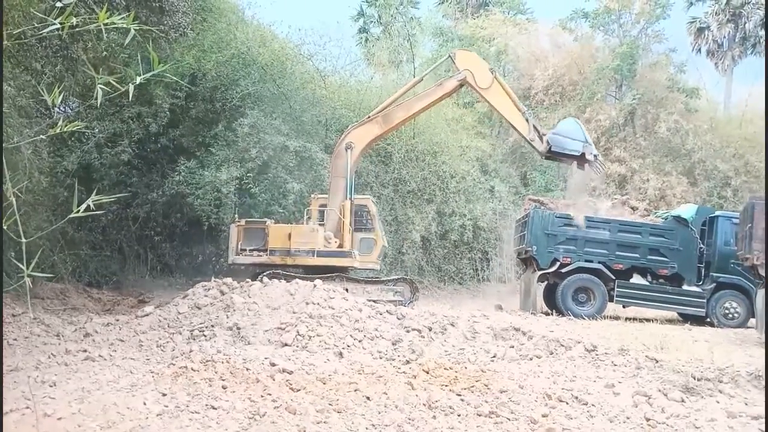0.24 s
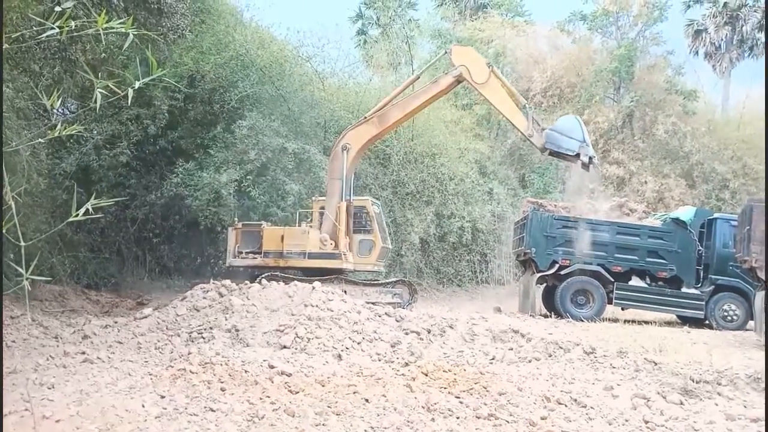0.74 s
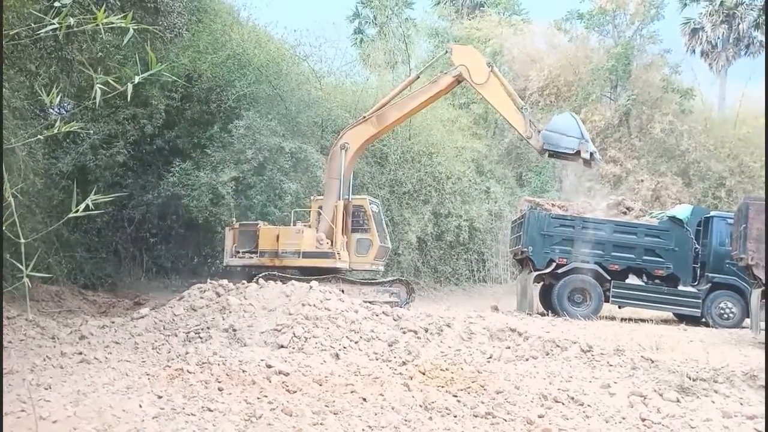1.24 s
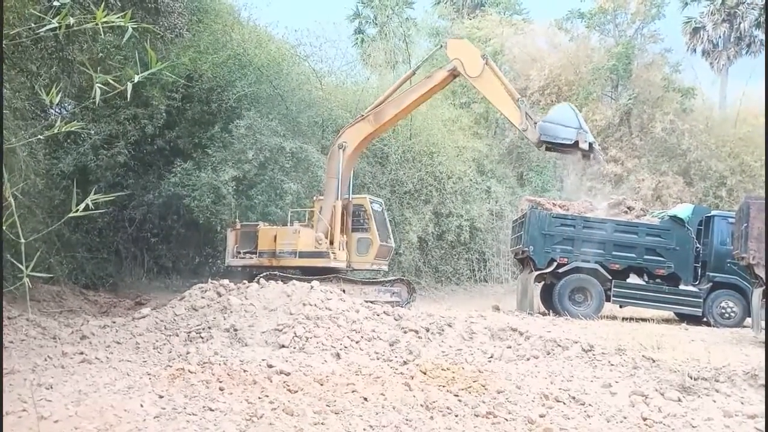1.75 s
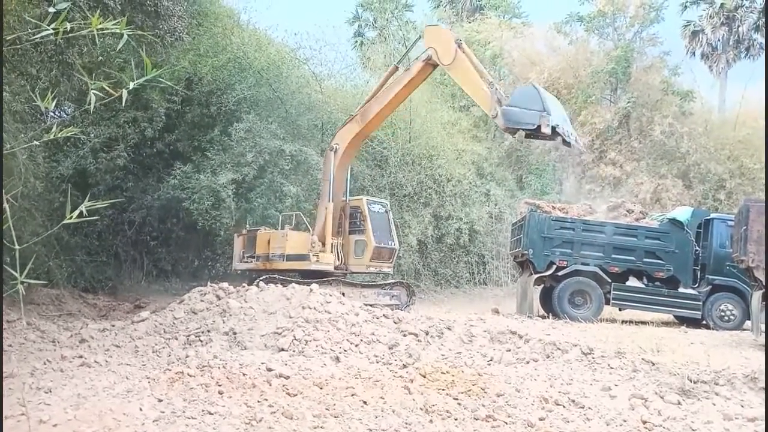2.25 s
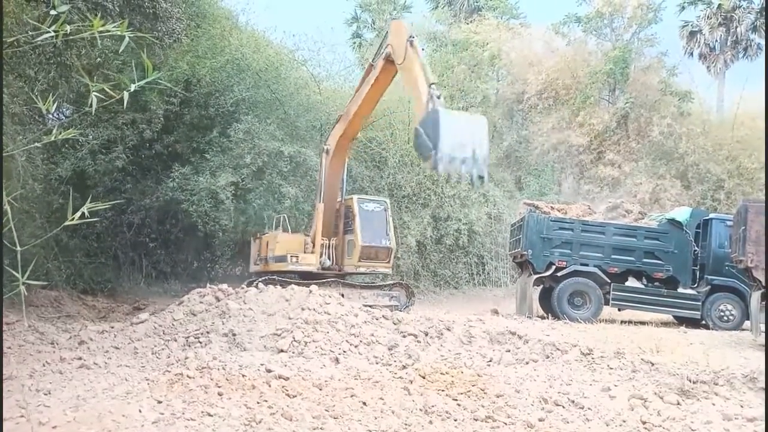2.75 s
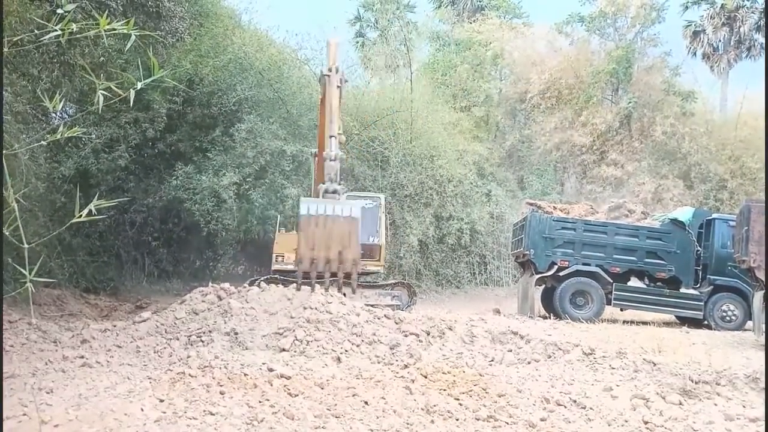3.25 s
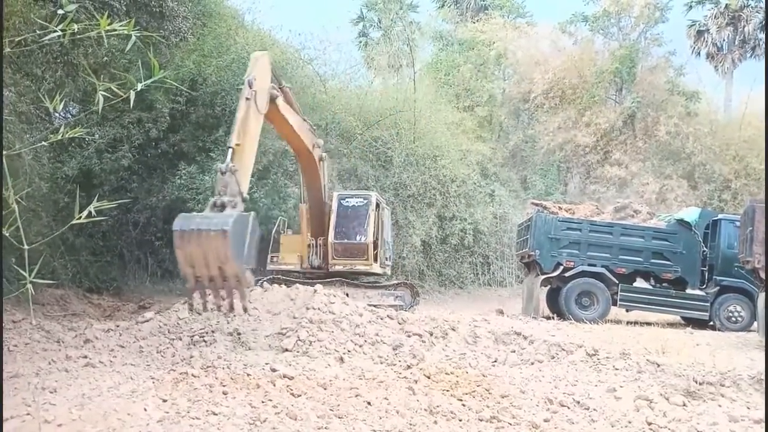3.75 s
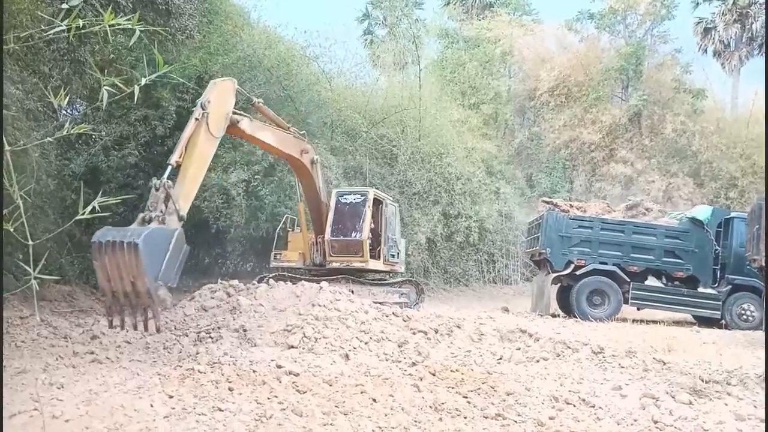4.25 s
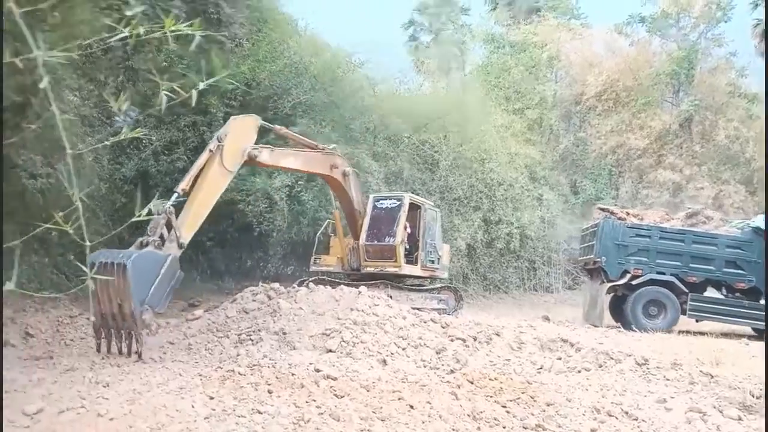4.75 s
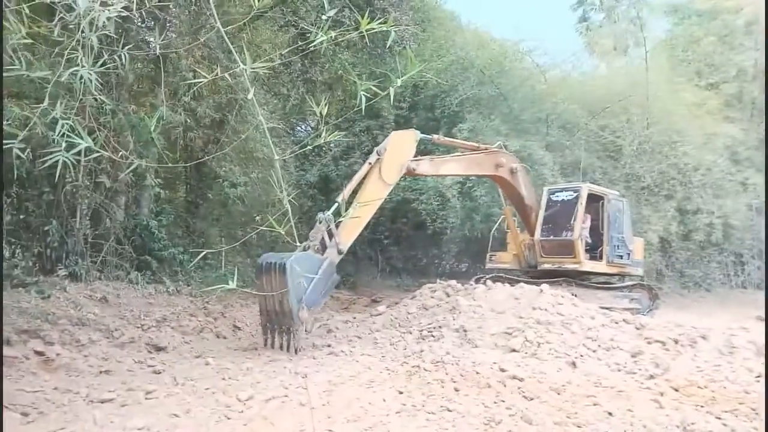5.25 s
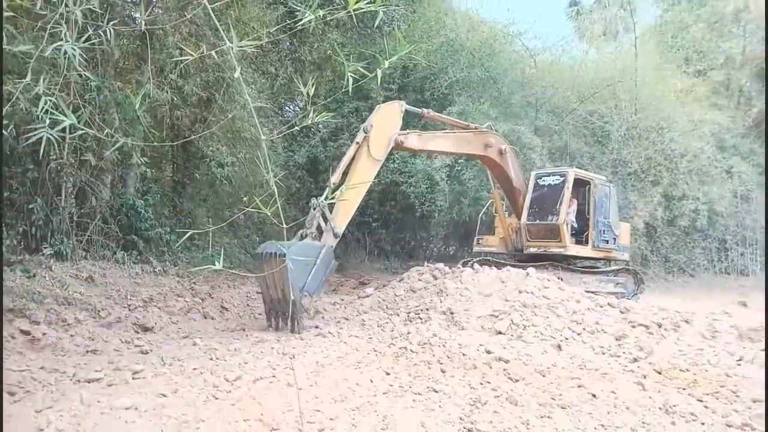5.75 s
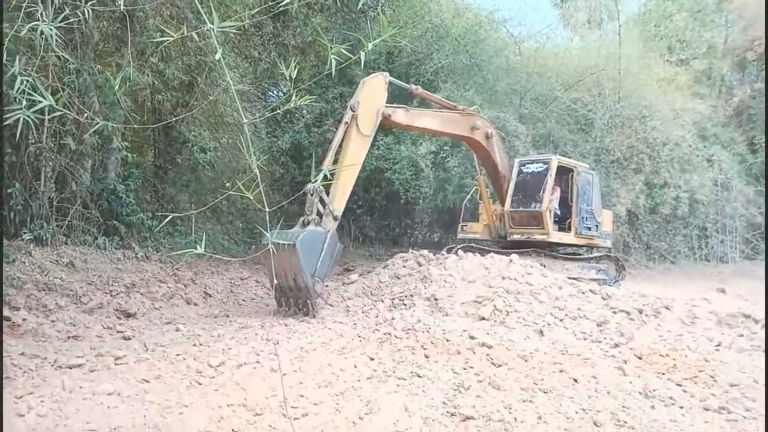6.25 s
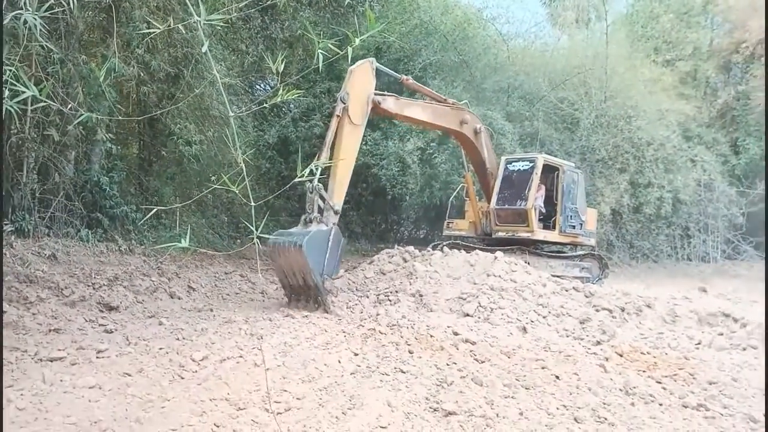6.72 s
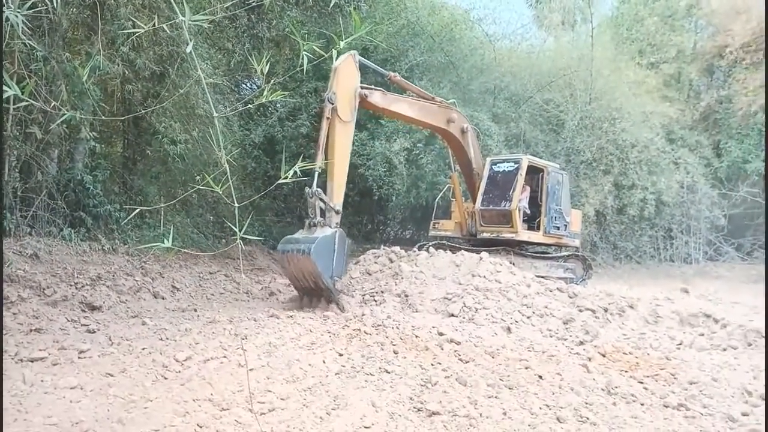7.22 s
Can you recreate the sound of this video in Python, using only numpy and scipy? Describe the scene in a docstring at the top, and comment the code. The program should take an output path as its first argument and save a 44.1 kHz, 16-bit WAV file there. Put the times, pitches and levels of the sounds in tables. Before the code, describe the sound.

Continuous engine drone, close to a low buzzing hum, under rough mid-range roar. Rattling steel knocks and dull hollow booms come early, a dense cluster follows near three seconds with a faint squeak, and more ringing knocks come around four. Then mostly engine with a low growl, before the loudest clanks of digging and low earthy thuds. Open ground with bushes smears the sound slightly; the small stereo microphone sounds dull on top, its level sinking after bursts and creeping back.

```python
"""A diesel excavator, some way off, first empties its bucket into a truck on the right, with clanks and booms.
After a short low growl it swings round and digs into stony soil, its clanks now from the middle.
Throughout, periodic exhaust tones drone over the filtered-noise roar of engine and fan; struck steel rings in modes.
Last, in a small stereo microphone, slow gain sinks after each burst of clanks and creeps back,
and a look-ahead limiter ducks everything around the hardest ones."""
import sys
import numpy as np
from scipy import signal
from scipy.fft import rfft, irfft, next_fast_len
from scipy.io import wavfile
from scipy.ndimage import uniform_filter1d, minimum_filter1d

SR = 44100
rng = np.random.default_rng(int(sys.argv[2]) if len(sys.argv) > 2 else 0)


def digitize_waveform(pressure):
    """Quantize a signal to 16-bit integers and store it at the path in sys.argv[1].

    Rows of a 2-D input are taken as channels; values are limited to [-1, 1].
    """
    field = np.atleast_2d(pressure).T
    bounded = np.clip(field, -1, 1)
    quanta = np.round(bounded * 32767).astype(np.int16)
    wavfile.write(sys.argv[1], SR, quanta)


N = 329868
T = np.arange(N) / SR

# Exhaust under changing load: t/s, firing rate f/Hz, drone level/dB
EXHAUST = [(0.0, 95, -16), (0.25, 92.9, -18), (0.37, 103.1, -15.5), (0.54, 102.4, -13.5),
           (1.29, 101.2, -14.5), (1.8, 98.6, -14), (2.64, 100.4, -12.5), (2.89, 102, -20),
           (3.58, 102.4, -16.5), (3.7, 98.6, -15), (4.08, 96.77, -16), (4.75, 95.8, -12),
           (5.29, 92.95, -12), (5.42, 98.5, -11), (5.69, 101.1, -21.5), (5.79, 100.6, -18.5),
           (6.29, 99, -12.5), (6.65, 99.4, -11), (7.1, 98.4, -16), (7.48, 99.5, -18)]
# Whine at six times the firing rate: t/s, level/dB re drone
WHINE = [(0, -12.5), (2, -23.5), (2.75, -17), (3, -27), (4.1, -15.5), (4.37, -15.5), (4.64, -28.5),
         (4.75, -7), (5.0, -15.5), (5.3, -20.5), (5.5, -21.5), (7.48, -20)]
# Other exhaust orders: multiple of the firing rate, level/dB re drone, change/(dB per Hz of sag)
ORDERS = [(1.5, -14.5, -0.6), (2, -23.5, 1.83), (3, -26, 0.69), (3.5, -30, 0.2), (8, -37.5, 0.95),
          (8.5, -32.5, 0.93), (9, -28.5, 0.63)]
FREE_HZ = 102  # firing rate without load, from which the sag is counted

# Clanks of pins and stones on the bucket: t/s, relative level/dB, centre f/Hz, low share level/dB,
# treble share level/dB, relative rattle length/s, rise time constant/s
CLANKS = [(0.22, -6, 1254, -4.5, -17.5, 0.055, 0.0026), (0.469, -8.5, 3010, -3.5, -26, 0.013, 0.0038),
          (0.684, -1, 1610, 0, -17, 0.02, 0.0075), (1.183, -1.5, 2320, -3, -27, 0.05, 0.00055),
          (1.216, -7.5, 1340, 0.5, -14, 0.031, .003), (1.251, -2.5, 1950, -7, -14, 0.035, 0.0015),
          (1.255, -9.5, 5080, -15, -17, 0.011, 0.0027), (1.426, -4, 1930, -4, -11.5, 0.035, 0.0035),
          (1.496, -11.5, 2550, -22.5, -12, 0.012, 0.00087), (1.674, -10.5, 1820, -19, -26, 0.051, 0.0039),
          (2.664, -0.5, 2430, -3, -22.5, 0.035, 0.0061), (2.687, -10, 3300, 8, -22, 0.017, 0.0067),
          (2.709, -11, 1440, -12.5, -24, 0.021, 0.0016), (2.816, -15.5, 2540, -8, -27.5, 0.029, 0.0039),
          (2.8864, 1, 1386, -12, -37, 0.046, 0.0009), (2.889, -6, 2480, -23.5, -29, 0.03, 0.00074),
          (2.979, -8.5, 2190, 0, -34, 0.012, 0.0025), (2.999, -8.5, 2390, -20.5, -38, 0.0088, .001),
          (3.031, -0.5, 2100, -3.5, -29, 0.021, 0.00078), (3.578, -3, 2080, -20, -27, 0.019, 0.00022),
          (3.599, -7, 1370, 0.5, -33, 0.053, 0.0015), (3.855, -0.5, 1650, -17, -21, 0.035, 0.00019),
          (3.916, 2, 1550, -17.5, -34, 0.036, 0.00036), (4.025, -9, 1510, -8, -42, 0.013, .0005),
          (4.052, -1.5, 1252, -24, -29, 0.023, 0.00024), (4.088, -1, 1510, -15.5, -28, 0.015, .0003),
          (4.138, 2, 1536, -10.5, -27, 0.022, .0003), (5.283, -5, 1700, -0.5, -20, 0.13, .003),
          (5.325, -12.5, 3700, -14, -20, 0.021, 0.0028), (5.408, 3, 1745, -10.5, -19.5, 0.056, 0.0046),
          (5.437, 4, 1730, -10, -28.5, 0.037, 0.0034), (5.471, -8, 1700, -11, -30, 0.019, 0.0017),
          (5.6165, 7.5, 1910, -7.5, -7, 0.045, 0.0011), (5.705, -3, 1690, -4.5, -28, 0.11, 0.0024),
          (5.8972, 0.5, 1990, -15.5, -16, 0.045, 0.0011), (5.953, -4, 3040, -4.5, -25, 0.029, 0.0019),
          (6.016, -5.5, 2340, -7, -18.5, 0.045, 0.0025), (6.166, -4, 1880, -24.5, -18.5, 0.034, 0.002),
          (6.251, -6.5, 2150, -11.5, -34, 0.038, 0.005), (6.953, -5.5, 1780, -11, -19.5, 0.032, 0.0044),
          (7.284, 1, 2780, -21.5, -31, 0.041, 0.00021), (7.296, -0.5, 1280, 4, -15, 0.036, 0.0033),
          (7.352, -5.5, 1970, -2, -23, 0.022, .002)]
# Modes of the bucket: f/Hz, relative level/dB, relative decay time/s
BUCKET_MODES = [(580, -1.5, 0.078), (708, -3, 0.22), (774, -2, 0.18), (856, 5.5, 0.061), (964, 0, 0.2),
                (1030, -1.5, 0.33), (1091, 2, 0.21), (1179, 2.5, 0.13), (1293, -2.5, 0.13),
                (1506, 0, 0.078), (1586, -0.5, 0.11), (1675, 1.5, 0.11), (1768, -4, 0.14),
                (1911, 5.5, 0.09), (2065, -3, 0.08), (2208, -4, 0.13), (2222, -4, 0.091), (2405, 0, 0.088),
                (2558, -5.5, 0.17), (2825, -3, 0.1), (3060, -3.5, 0.13), (3204, -6.5, 0.22),
                (3550, -4.5, 0.13), (3874, -6.5, 0.17), (4330, -11.5, 0.069), (4440, -7, 0.12),
                (5010, -12.5, 0.096), (5320, -15.5, 0.13), (5510, -11.5, 0.11)]
LOW_SPLIT_HZ = 1200  # bucket modes below it follow the low share
HIGH_SPLIT_HZ = 2800  # bucket modes above it ring with the treble share too

# Booms of the hollow steel arm and truck bed: t/s, relative level/dB, centre f/Hz
BOOMS = [(0.021, -2.5, 382), (0.043, -1.5, 388), (0.196, -5.5, 400), (0.465, -10, 305), (0.566, -9.5, 360),
         (0.7, -2, 315), (1.219, -6, 304), (1.437, -8, 372), (1.855, -1, 334), (2.681, -7.5, 267),
         (2.724, -4.5, 405), (2.821, -6.5, 301), (2.903, 0.5, 289), (2.976, -2.5, 345), (3.038, -1, 335),
         (3.609, -6.5, 417), (3.946, -7, 324), (4.061, -4, 342), (4.099, -8.5, 355), (4.149, -3, 352),
         (5.431, -2.5, 374), (5.478, -6.5, 365), (5.673, -4, 395), (5.814, -10, 378), (5.907, -7.5, 343),
         (6.275, -5.5, 387), (6.9, -8, 367), (7.359, -10.5, 370), (7.404, -11, 362)]
# Modes of the hollow steel: f/Hz, relative level/dB
HOLLOW_MODES = [(265, 5.5), (295, 9.5), (335, 8), (365, 9.5), (420, 7), (515, 12.5), (550, 17)]

# Engine and fan roar: t/s, then relative level/dB of body, clatter and hiss
ROAR = [(0.0, -16, -16, -30.5), (0.35, -25.5, -22.5, -42.5), (0.77, -21.5, -18.5, -40),
        (1.83, -22.5, -24, -43), (2.17, -26, -21, -39.5), (2.58, -22, -20.5, -38.5),
        (3.14, -30.5, -28, -45.5), (3.83, -26.5, -28, -41.5), (4.3, -29.5, -29.5, -40),
        (4.92, -28, -23.5, -38.5), (5.31, -26, -25.5, -36), (5.8, -27.5, -30.5, -44.5),
        (6.5, -24, -23, -38), (7.48, -32, -28, -42)]
# Turning of the house: t/s, share of the swung-round colour, stretch of the side-on peaks
SWING = [(0, 0.14, 1.), (4.2, 0.23, 1.003), (4.6, 0.18, 1.02), (5.1, 0.15, 0.936), (5.4, 1., 0.82),
         (7.48, 0.91, 0.68)]
# Colour of the machine seen side-on: f/Hz, relative spectral level/dB
SIDE_ON = [(200, -4.5), (254, -16), (290, -4), (520, -6.5), (626, -11.5), (860, -3.5), (1040, -23.5),
           (1150, -13), (1550, -5), (1670, -18.5), (1850, -11), (1990, -17), (2240, -12), (2420, -4),
           (2750, -14.5), (3250, -6), (3520, -10.5), (3900, -5), (4080, -11.5), (5100, -8), (5350, -9)]
# Colour of the machine swung round: f/Hz, relative spectral level/dB
SWUNG_ROUND = [(200, 3), (245, -15), (300, -7.5), (355, -1), (400, -7.5), (727, -11), (910, -8.5),
               (1250, -10), (1370, -27), (1660, -13.5), (1900, -23.5), (2500, -11), (2900, -14),
               (4000, -16)]
# Spectrum added to both colours of the roar: f/Hz, relative spectral level/dB
OUTSKIRTS = [(25, -23), (50, -36), (80, -11), (200, -5), (4000, 1.5), (5500, 3.6), (8000, -2.5),
             (13500, -8), (14500, -0.5)]

# Low thuds of earth in the steel: t/s, relative level/dB, f/Hz
THUDS = [(0.55, -14, 148.2), (2.71, -13, 143.4), (3.616, -4.5, 162.5), (3.929, -3, 135.3),
         (6.24, -6.5, 158.5), (6.5, -2.5, 153), (6.731, -11.5, 153)]
RUMBLE_DB, THUD_RUMBLE_DB = -26, -2  # steady rumble; swell of it re each thud
THUD_RISE_S, THUD_T60_S = 0.016, 0.28
# Low growl: start t/s, length/s, level/dB, low f/Hz, high f/Hz
GROWL = (4.5, 0.2, -27.5, 193, 319)
# Thin squeaks: t/s, f/Hz, level/dB, length/s
SQUEAKS = [(1.49, 7780, -46, .045), (2.67, 3245, -27, .1)]

# Treble loss of the microphone: f/Hz, level/dB
MICROPHONE = [(5200, -3.5), (6500, -13), (9000, -20.5), (15000, -27.5)]
# Likeness of the two ports: f/Hz, left-right correlation (0 to 1)
LIKENESS = [(100, 1.), (250, 0.97), (450, 0.95), (1000, 0.72), (1400, 0.54), (1900, 0.17), (2500, 0.29),
            (3600, 0.3), (7000, .15), (12000, 0.46)]
# Balance of the two ports: f/Hz, left minus right level/dB
LEAN = [(100, -0.44), (500, -1), (1000, 1), (1150, -1.5), (1550, 8), (1950, -1), (2350, 11.5), (2900, 3.5),
        (4200, 2), (5000, 4.5), (6200, -0.5), (9000, -3.5), (12000, 3.5)]
# Lead of the right port, machine straight ahead: f/Hz, phase/rad
AHEAD_LEAD = [(700, 0.086), (4000, 0.49), (6500, 1.96)]
# Lead of the right port, bucket out over the truck to the right: f/Hz, phase/rad
TRUCK_LEAD = [(2000, .1), (2800, 2.5), (4100, 4.4), (5800, 5.9)]
LEAVES_TRUCK_S = 2.8
# Slow gain: averaging time, threshold, share of the excess removed, smoothing time, fall of the held excess
GAIN_HEARS_S, GAIN_ABOVE_DB, GAIN_SHARE, GAIN_SMOOTH_S, HELD_FALL_DB_PER_S = 0.028, -19.5, 0.59, 0.072, 7.5
EDGE_HZ = 15400  # upper band limit


def exhaust():
    """Fourier synthesis: a periodic source yields multiples of its firing rate; returns sound and firing count."""
    hz, drone_db = columns(EXHAUST, T)
    turns = np.cumsum(hz * (1 + 0.00422 * wander(size=900))) / SR
    sag_hz = FREE_HZ - hz
    orders = [(1, 0.0077), (6, *columns(WHINE, T))]
    orders += [(k, db + slope * sag_hz) for k, db, slope in ORDERS]
    tones = np.zeros(N)
    for k, db in orders:
        unsteady_db = (1.07 + 0.3 * k) * wander(size=1200)
        tones += amp(drone_db + db + unsteady_db) * np.cos(2 * np.pi * k * turns)
    return np.sqrt(2) * tones, turns


def clanks():
    """Modal excitation: knocks drive the bucket modes near the struck spot, under grit; two draws, for two paths."""
    out, t = np.zeros((2, N)), np.arange(SR // 4) / SR
    both = (2, len(t))
    hz, mode_db, decay = np.transpose(BUCKET_MODES * 2)  # every mode is a close pair
    chance = rng.standard_normal((len(CLANKS), 2, len(hz)))
    for (s, db, centre_hz, low_db, treble_db, length, rise), (uneven, detune) in zip(CLANKS, chance):
        away = np.log2(hz / centre_hz)  # octaves from the struck spot; higher modes are harder to drive
        near_db = np.where(hz < LOW_SPLIT_HZ, low_db, -13. * away ** 2 - 4.0 * np.maximum(away, 0))
        near_db = np.where(hz > HIGH_SPLIT_HZ, np.maximum(near_db, treble_db + 9.5), near_db)
        # the way to the microphone tints the clank as it tints the roar
        swing, _ = columns(SWING, s)
        near_db = near_db + 0.53 * ((1 - swing) * read(SIDE_ON, hz) + swing * read(SWUNG_ROUND, hz))

        start_db = mode_db + near_db + 2.7 * uneven
        fall = amp(start_db[:, None] - 60 * t / (0.36 * decay[:, None]))
        modes = (fall * np.sin(2 * np.pi * np.outer(hz * (1 + 0.014 * detune), t))).sum(0)
        modes *= 1 - np.exp(-t / 0.00087)  # steel on steel through grit: a blunt contact

        shake = np.exp(-(t / (length + 0.011)) ** 2) + 0.28 * amp(-60 * t / 1.0)
        shake += 1.5 * np.exp(-t / 0.0072)  # the first blow is the hardest
        shake *= 1 - np.exp(-t / (rise + 1e-5))
        knocks = rng.standard_normal(both) * (rng.random(both) < 1600 / SR) * shake
        knocks[:, 12] = 2.6 * np.exp(-rise / 0.0026)  # a sudden clank opens with one clean knock
        rung = signal.fftconvolve(knocks, modes[None], axes=1)[:, :len(t)]

        edges = 0.8 * centre_hz, 1.3 * centre_hz
        scrape = band(band(rng.standard_normal(both), *edges), *edges) * shake
        grains = rng.standard_normal(both) * (0.39 + (rng.random(both) < 900 / SR) * 4.0)
        grit = band(band(grains, 1500, 5500), 2500, 10000) * shake
        grit *= 0.18 + np.exp(-t / 0.017)  # the crack is over first
        rung, scrape, grit = (even_onset(x) for x in (rung, scrape, grit))
        clank = amp(db - 10.5) * (rung + 0.47 * scrape + amp(treble_db + 2.5) * grit)
        for path, sound in zip(out, clank):
            add(path, s, sound)
    return out


def booms():
    """Damped free vibration: each blow swells quickly and rings the hollow modes nearest its centre."""
    out, t = np.zeros(N), np.arange(SR // 2) / SR
    hz, mode_db = np.transpose(HOLLOW_MODES)
    chance = rng.random((len(BOOMS), 2, len(hz)))
    for (s, db, centre_hz), (phase, detune) in zip(BOOMS, chance):
        near = amp(mode_db - 60. * np.log2(hz / centre_hz) ** 2)
        cycles = np.outer(hz * (1 + 0.062 * (detune - .5)), t)
        waves = np.sin(2 * np.pi * (cycles + 0.53 * phase[:, None]))
        ring = (near / np.linalg.norm(near)) @ waves
        shape = amp(db - 2.5 - 60 * t / 0.34) * (1 - np.exp(-t / 0.0016))
        add(out, s - .004, shape * ring)
    return out


def roar(turns):
    """Filtered noise: spectral peaks and hollows shift as the house swings; two draws, for two paths."""
    frames, hz = N // 256 + 5, np.fft.rfftfreq(1024, 1 / SR)
    t = np.arange(frames) * 256 / SR
    a, b, c, d, patches, strands = rng.standard_normal((frames, 513, 6)).T
    # strands are brief narrow resonances; patches are broader in frequency
    strands = evened(uniform_filter1d(uniform_filter1d(strands, size=2, axis=0), size=16, axis=1))
    patches = evened(uniform_filter1d(uniform_filter1d(patches, size=10, axis=0), size=24, axis=1))

    swing, stretch = columns(SWING, t)
    side_on = read(SIDE_ON, np.outer(hz, 1 / stretch)) * (1 - swing)
    colour = side_on + np.outer(read(SWUNG_ROUND, hz), swing) + read(OUTSKIRTS, hz)[:, None]

    # each level holds for its own band; between the bands the gain is blended
    for_band = [(hz > lo) & (hz < hi) for lo, hi in ((400, 1000), (1200, 3000), (4000, 7000))]
    levels = columns(ROAR, t)
    gains = [db - 10 * np.log10((amp(colour[m]) ** 2).sum(0)) for db, m in zip(levels, for_band)]
    weights = [np.interp(np.log(hz + 1), np.log([700, 1900, 5000]), row) for row in np.eye(3)]
    blended = sum(np.outer(w, g) for w, g in zip(weights, gains))

    field = colour + blended + 0.95 * patches + 2.05 * strands
    spectra = np.array([a + 1j * b, c + 1j * d]) * amp(field + 3.5)
    noise = signal.istft(spectra, nperseg=1024, noverlap=768)[1][:, :N]
    # the roar throbs with each firing, every other one stronger
    return noise * (1 + 0.03 * np.cos(np.pi * turns) + 0.072 * np.cos(2 * np.pi * turns))


def rumble():
    """Damped resonance and modulated noise: each thud rings briefly and swells a loose low rumble."""
    swell, rings, t = amp(RUMBLE_DB + 3.2 * wander(size=3000)), np.zeros(N), T[:SR // 2]
    for s, db, hz in THUDS:
        shape = amp(db - 60 * t / THUD_T60_S) * (1 - np.exp(-t / THUD_RISE_S))
        add(swell, s, amp(THUD_RUMBLE_DB) * shape)
        add(rings, s, shape * np.sin(2 * np.pi * hz * t))
    noise = band(band(rng.standard_normal(N), 122, 196.0), 122, 196.0)
    return rings + swell * evened(noise)


def growl():
    """Band-limited noise under an envelope: a low growl swells and fades."""
    out, (s, length, db, lo_hz, hi_hz) = np.zeros(N), GROWL
    count = round(length * SR)
    noise = evened(band(rng.standard_normal(N), lo_hz, hi_hz))[:count]
    add(out, s, amp(db) * np.sqrt(np.hanning(count)) * noise)
    return out


def squeak():
    """Simple harmonic motion under a smooth envelope: brief high tones."""
    out = np.zeros(N)
    for s, hz, db, length in SQUEAKS:
        t = np.arange(round(length * SR)) / SR
        add(out, s, amp(db) * np.hanning(len(t)) * np.sin(2 * np.pi * hz * t))
    return out


def scattered(x):
    """Multiple scattering: bushes and heaps of earth smear the sound, its colour kept nearly even."""
    spread = rfft(rng.standard_normal(4096) * np.exp(-np.arange(4096) / 180.0))
    taps = irfft(spread / abs(spread))[:2048]
    return signal.fftconvolve(x, taps / np.linalg.norm(taps))[:N]


def ports(direct, diffuse, lead):
    """Partial coherence: of two close ports, dull in the treble, the right hears part by other paths."""
    size = next_fast_len(N + 4096)
    hz = np.fft.rfftfreq(size, 1 / SR)
    same, lean = read(LIKENESS, hz), amp(read(LEAN, hz) / 2)
    left, other = rfft(direct, size), rfft(diffuse, size)
    # below the first tabled frequency the lead shrinks in proportion to frequency
    phase = read(lead, hz) * np.minimum(hz / lead[0][0], 1)
    right = (same * left + np.sqrt(1 - same ** 2) * other) * np.exp(1j * phase)
    return irfft(np.array([left * lean, right / lean]) * amp(read(MICROPHONE, hz)), size)[:, :N]


def amp(db):
    """Logarithmic level law: dB to gain."""
    return 10 ** (np.asarray(db) / 20)


def evened(x):
    """Mean-square normalisation: rms 1."""
    return x / np.sqrt(np.mean(x ** 2) + 1e-20)


def even_onset(x):
    """Mean-square normalisation: rms 1 over the first 900 samples of each path."""
    return x / np.sqrt(np.mean(x[:, :900] ** 2, axis=1, keepdims=True))


def read(points, hz):
    """Logarithmic pitch scale: a spectrum table interpolated on a log axis."""
    f, value = np.transpose(points)
    return np.interp(np.log(hz + 1), np.log(f + 1), value)


def columns(rows, t):
    """Linear interpolation: every column of a curve table at the times t."""
    s, *rest = np.transpose(rows)
    return [np.interp(t, s, c) for c in rest]


def add(mix, s, sound):
    """Superposition: mixes a sound in at s seconds."""
    part = mix[round(s * SR):][:len(sound)]
    part += sound[:len(part)]


def band(x, lo_hz, hi_hz):
    """Band-pass filtering by a Butterworth response."""
    return signal.sosfilt(signal.butter(2, [lo_hz, min(hi_hz, SR / 2.1)], "band", fs=SR, output="sos"), x)


def wander(size):
    """Smoothed random process: slow chance, smooth over about size samples."""
    return evened(uniform_filter1d(uniform_filter1d(rng.standard_normal(N), size), size))


def lag(x, seconds):
    """First-order relaxation: follows x with a time constant."""
    r = np.exp(-1 / (seconds * SR))
    return signal.lfilter([1 - r], [1, -r], x, zi=[r * x[:2000].mean()])[0]


def held_over(power, above_db, back_db_per_s):
    """Peak hold: dB by which power tops a threshold, sinking back at a steady rate."""
    fall = T * back_db_per_s
    held_db = np.maximum.accumulate(10 * np.log10(abs(power) + 1e-12) + fall) - fall
    return np.maximum(held_db - above_db, 0)


def scene():
    """Superposition at two ports: the bucket's clanks come from the right, then from the middle."""
    drone, turns = exhaust()
    near, far = roar(turns)
    steel = drone + rumble() + growl() + booms() + squeak()
    struck, over_truck = clanks(), T < LEAVES_TRUCK_S
    machine = np.array([steel + near, scattered(steel) + far])
    ahead = ports(*(machine + struck * ~over_truck), AHEAD_LEAD)
    return ahead + ports(*(struck * over_truck), TRUCK_LEAD)


def record(dry):
    """Dynamic compression: slow gain, then a limiter, both steered above the bass; last, a band limit."""
    power = band(dry.mean(0), 700, 9000) ** 2
    held_db = held_over(lag(power, GAIN_HEARS_S), GAIN_ABOVE_DB, HELD_FALL_DB_PER_S)
    slow = amp(-GAIN_SHARE * lag(held_db, GAIN_SMOOTH_S))
    over_db = held_over(uniform_filter1d(power * slow ** 2, 300), above_db=-14.5, back_db_per_s=54.0)
    ahead_db = -minimum_filter1d(-over_db, size=900, origin=-449)  # the largest excess in the next 20 ms
    ducked = dry * slow / amp(0.73 * uniform_filter1d(ahead_db, size=500))
    ducked = ducked / (1 + (ducked / .95) ** 4) ** .25  # the last peaks are rounded off
    low_pass = signal.firwin(511, EDGE_HZ, window=("kaiser", 9), fs=SR)
    return signal.oaconvolve(ducked, low_pass[None], "same")


dry = scene()
out = record(dry)
digitize_waveform(out)
```